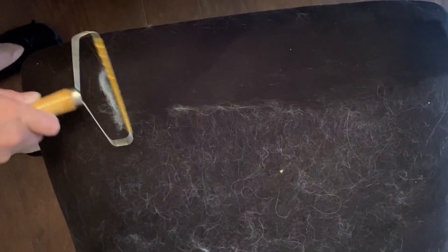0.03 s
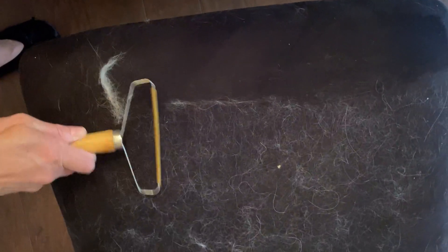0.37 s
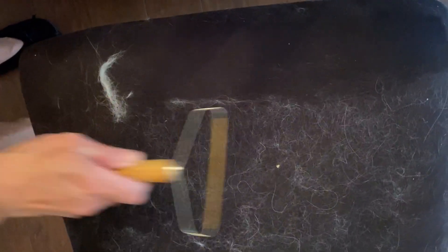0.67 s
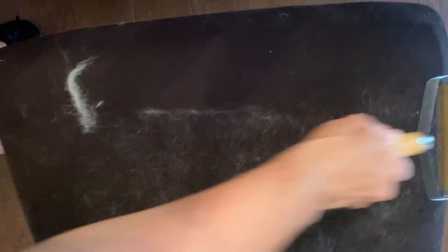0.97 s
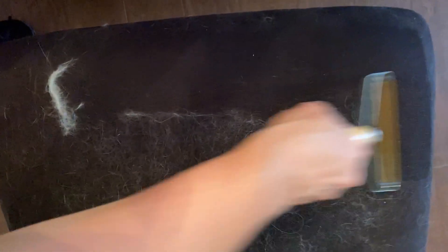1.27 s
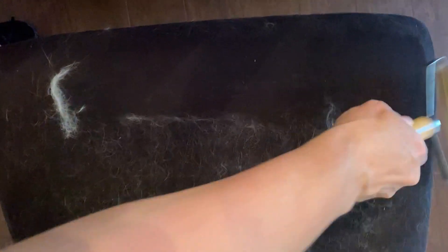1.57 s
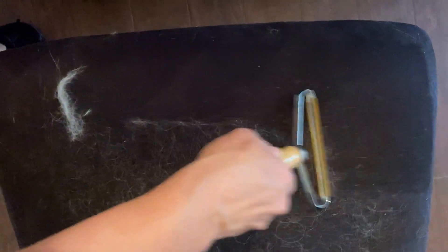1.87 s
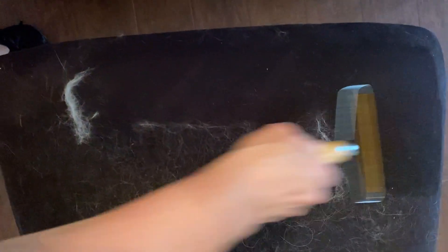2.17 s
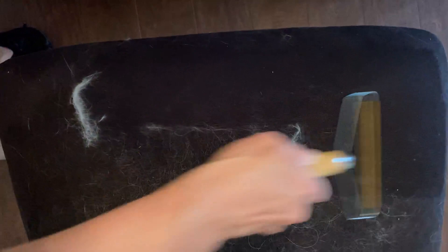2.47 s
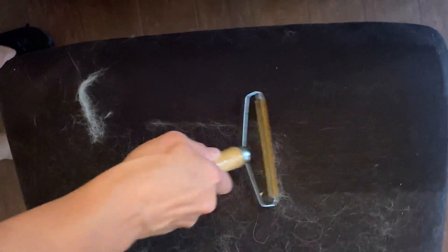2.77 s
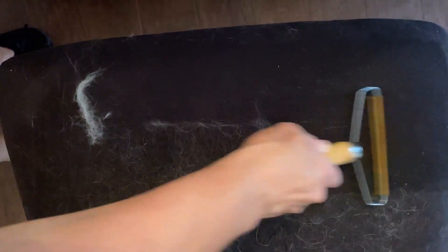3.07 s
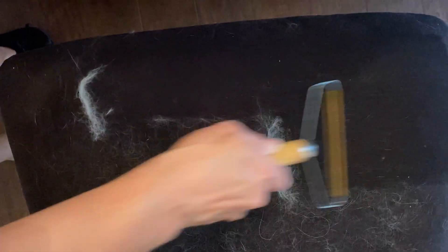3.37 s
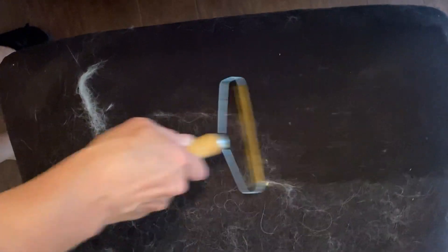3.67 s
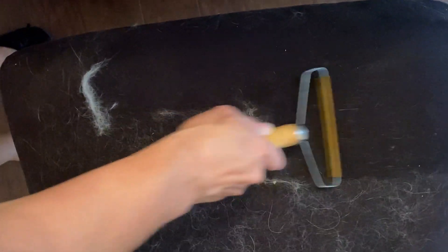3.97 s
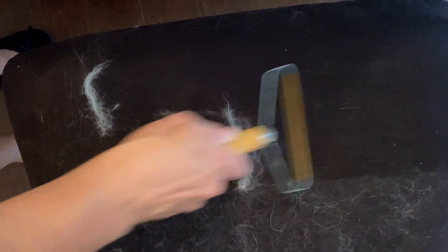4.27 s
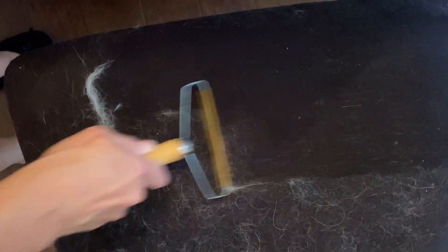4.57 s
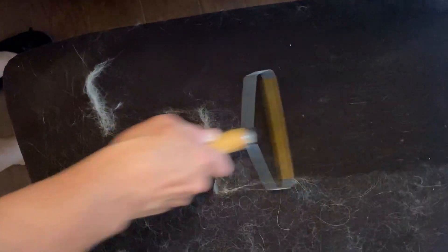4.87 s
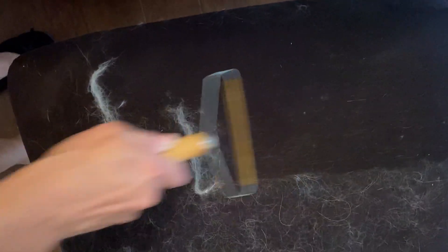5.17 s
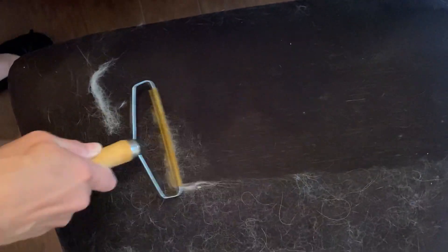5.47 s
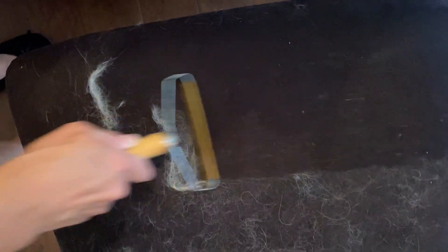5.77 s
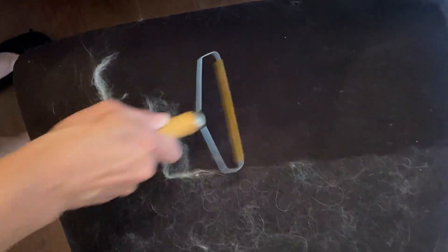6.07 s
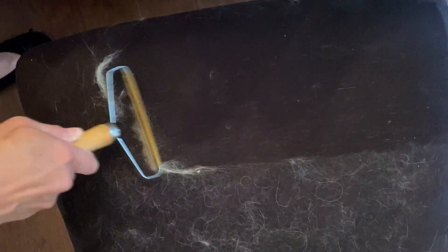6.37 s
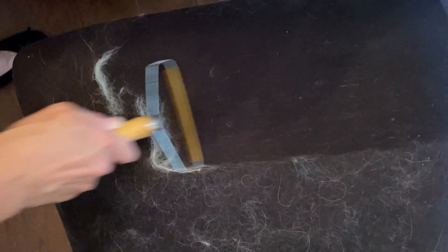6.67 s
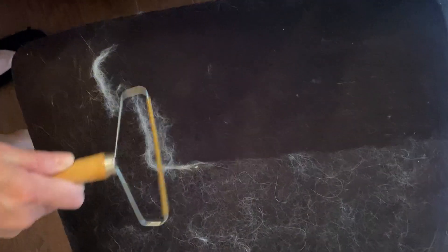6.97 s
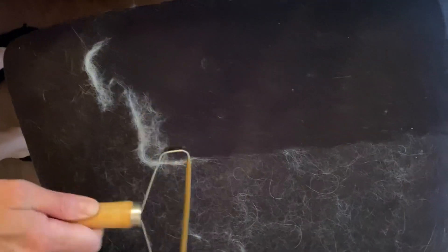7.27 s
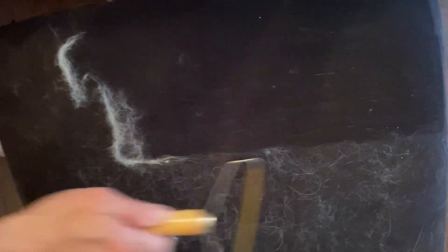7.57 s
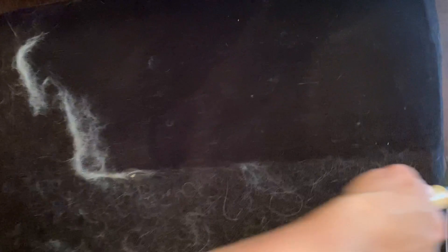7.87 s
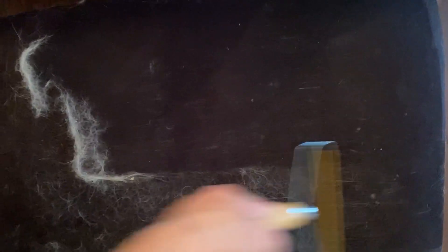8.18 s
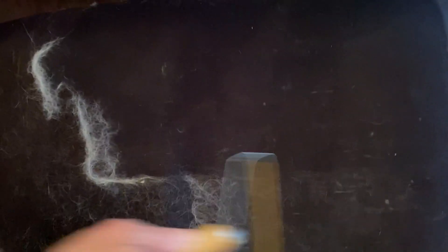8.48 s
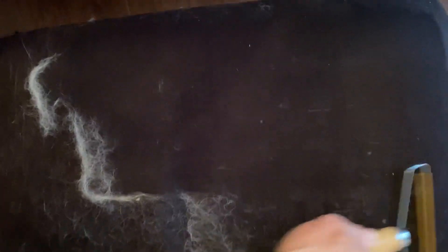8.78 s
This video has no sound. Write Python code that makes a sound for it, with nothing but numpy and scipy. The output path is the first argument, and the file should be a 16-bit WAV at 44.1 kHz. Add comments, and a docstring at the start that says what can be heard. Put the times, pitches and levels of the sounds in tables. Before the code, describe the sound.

Dry, rhythmic scraping of a metal blade on upholstery, each stroke landing with a small tick and thump, ending in one longer pull.

```python
"""Short, dry rasps on cloth, about two a second: a pet hair scraper pulled over a fabric chair seat.
The toothed blade lands with a tick and a soft thump, then plucks through the fibres while the seat
drums and the steel frame rings. The weave sings briefly where the edge lines up with the threads.
Light brushes fall around the run of strokes, and one longer pull ends it.
A small, faintly humming room answers, heard through a close pair of microphone ports."""
import sys
import numpy as np
from scipy import signal
from scipy.fft import rfft, irfft, next_fast_len
from scipy.io import wavfile
from scipy.ndimage import uniform_filter1d, map_coordinates

SR = 44100
rng = np.random.default_rng(int(sys.argv[2]) if len(sys.argv) > 2 else 0)


def unload_wav(signal):
    """Save mono or channel-first audio to the path in sys.argv[1] as 16-bit WAV at rate SR, clipped to [-1, 1]."""
    wavfile.write(
        sys.argv[1],
        SR,
        np.round(np.clip(np.atleast_2d(signal).T, -1, 1) * 32767).astype(np.int16),
    )


N = 388962


def amp(db):
    """Decibels to gain."""
    return 10 ** (np.asarray(db) / 20)


def unit(x):
    """Scale to rms 1."""
    return x / np.sqrt(np.mean(x ** 2) + 1e-20)


def along(points, hz):
    """Read a curve of (Hz, value) points on a log frequency axis."""
    freqs, values = np.transpose(points)
    return np.interp(np.log(hz + 1), np.log(freqs + 1), values)


def wobble(rate):
    """A smooth random curve with `rate` knots a second."""
    places = np.arange(0, N + 16, 16)
    knots = rng.standard_normal(int(N * rate / SR) + 4)
    return np.interp(np.arange(N), places, map_coordinates(knots, [places * rate / SR]))


def filtered(x, response):
    """Shape x with a complex response, given as a function of Hz."""
    size = next_fast_len(N + SR // 4, True)
    spectrum = rfft(x.astype(np.float32), size)
    curve = response(np.fft.rfftfreq(size, 1 / SR)).astype(np.complex64)
    return irfft(spectrum * curve, size)[..., :N]


def resonances(modes, hz):
    """Summed response of (centre Hz, width Hz, dB) modes."""
    return sum(amp(db) * 1j * hz * width / (centre * centre - hz * hz + 1j * hz * width)
               for centre, width, db in modes)


def add(track, s, sound):
    """Mix a sound into a track at s seconds."""
    rest = track[max(round(s * SR), 0):][:len(sound)]
    rest += sound[:len(rest)]


# The colour of the room's noise floor. Each row: frequency in Hz, spectral level in dB.
HUSH_SPECTRUM = [(20, -35), (40, -4), (65, 0), (100, -7), (200, -9), (350, -12), (550, -23), (1300, -28),
                 (2500, -35), (5000, -45), (15000, -62)]

def room_tone(hush_db, hum_hz, hum_db, start_db=-10, settle_s=0.92):
    """A bed of low room noise and faint mains hum that starts quieter and comes up."""
    t = np.arange(N) / SR
    drift = amp(1.5 * wobble(5))
    hush = unit(filtered(rng.standard_normal((2, N)), lambda hz: amp(along(HUSH_SPECTRUM, hz))))
    bed = amp(hush_db) * drift * hush
    bed[0] += amp(hum_db + wobble(3.3)) * np.sin(2 * np.pi * hum_hz * t)
    return bed * amp(start_db * np.maximum(1 - (t / settle_s) ** 2, 0))


# The small room's decay. Each row: frequency in Hz, seconds to fall 60 dB.
ROOM_DECAY = [(100, 0.6), (400, 0.38), (1500, 0.41), (5000, 0.41), (14000, 0.25)]

def room_reverb(x):
    """Two diffuse tails, for the direct and the scattered part; the bass hangs on longest."""
    hz, t, noise = signal.stft(rng.standard_normal((2, SR)), SR, nperseg=256)
    decay = amp(-60 * t / along(ROOM_DECAY, hz)[:, None])
    tail = signal.istft(noise * decay * (1 - np.exp(-t / 0.0009)), SR, nperseg=256)[1]
    return signal.fftconvolve(x[None], tail / np.linalg.norm(tail[0]), axes=1)[:, :N]


# The colour of cloth under the blade. Each row: frequency in Hz, spectral level in dB.
CLOTH_SPECTRUM = [(60, -8), (140, -8.5), (210, 3.5), (340, 2.5), (480, -1.5), (650, 2), (1000, 2.5),
                  (1700, 0), (2500, -4.5), (3500, -10), (4500, -12.5), (7500, -16.5), (12000, -20),
                  (16000, -23.5)]
# The seat's resonances under the cloth. Each row: centre in Hz, width in Hz, level in dB.
SEAT_MODES = [(201, 9.4, 1.5), (255, 29, -1), (370, 8.7, -7), (450, 120, -7), (580, 36, -12),
              (1100, 6.3, -14), (1340, 4, -8.5), (2780, 19, -13.5)]

def fibres(plucks_per_s, spread_db, rub):
    """Teeth pluck single fibres over a smooth rub; returns a direct and a scattered part."""
    plucks = (rng.random((2, N)) < plucks_per_s / SR) * rng.choice([-1, 1], (2, N))
    strength = amp(spread_db * np.minimum(rng.standard_normal((2, N)), 2))
    force = unit(plucks * strength) + rub * rng.standard_normal((2, N))
    return filtered(force, lambda hz: amp(along(CLOTH_SPECTRUM, hz)) * (1 + resonances(SEAT_MODES, hz)))


def soft_touch(dull_hz):
    """Fibres pressed rather than scraped: a duller rustle of rms 1."""
    pressed = fibres(plucks_per_s=3300, spread_db=6.5, rub=0.65)
    return unit(filtered(pressed, lambda hz: 1 / (1 + 1j * hz / dull_hz)))


# Passing touches. Each row: start in seconds, rustle in dB, hiss in dB relative to the rustle,
# attack in seconds, seconds to fall 60 dB.
BRUSHES = [(0.411, -56, -14.5, 0.0048, .069), (.542, -34.5, -13.5, .0045, .09),
           (.583, -44.5, -16.5, .015, 0.091), (1.178, -58, -7.5, .009, 0.45),
           (7.35, -60.5, -5, .0036, 0.76), (7.528, -35, -36.5, 0.01, .072), (7.545, -44, -29, 0.01, .36),
           (8.038, -53.5, -10.5, .008, 0.16), (8.804, -55.5, -19.5, 0.0045, .15)]

def brushes():
    """The tool brushes or taps the cloth: a dull rustle with some fibre hiss."""
    t, rustle, hiss = np.arange(SR // 2) / SR, np.zeros(N), np.zeros(N)
    for start, db, hiss_db, attack, t60 in BRUSHES:
        touch = amp(db - 60 * np.maximum(t - attack, 0) / t60) * np.minimum(t / attack, 1)
        add(rustle, start, touch)
        add(hiss, start, amp(hiss_db) * touch)
    return rustle * soft_touch(dull_hz=1497) + hiss * rng.standard_normal((2, N))


# The notes in the seat's thump. Each row: pitch in Hz, level in dB, seconds to fall 60 dB.
CUSHION_MODES = [(52.7, -12, 0.44), (78.8, 0, .17), (120.6, 1, 0.11), (219, -4, 0.11), (345, 0.5, 0.052)]

def cushion_bounce(t):
    """The struck cushion rings in low, damped modes, a little differently each time."""
    return sum(amp(db + rng.normal(0, 1.2) - 60 * t / t60) * np.sin(2 * np.pi * (hz * t + rng.random()))
               for hz, db, t60 in CUSHION_MODES)


# The blade meets the seat. Each row: time in seconds, then tick, low body and crack in dB before trims.
LANDINGS = [(0.024, -57.5, -43.5, -66), (0.408, -55, -37.5, -54), (0.548, -57, -34, -55.5),
            (1.696, -28.5, -40.5, -45.5), (2.156, -28, -40, -52.5), (2.651, -16, -38, -51.5),
            (3.123, -42.5, -36.5, -49.5), (3.558, -12.5, -36.5, -45.5), (4.015, -16, -34, -43),
            (4.448, -45, -39, -56.5), (4.913, -49.5, -36.5, -53.5), (5.359, -47.5, -36, -49),
            (5.768, -48.5, -40, -57), (6.226, -47, -40, -52.5), (6.675, -25, -41.5, -52),
            (7.531, -59, -49, -59.5), (8.007, -48, -43, -64.5), (8.799, -47.5, -39, -53.5)]

def landings(sweep_hz, glide_s, end_hz, tick_t60, bend_t60, crush_t60, thump_rise_s, crack_hz,
             tick_trim_db, bend_trim_db, crack_trim_db, thump_trim_db, crush_trim_db):
    """A landing sends a bending wave through the seat, crushes the pile and bounces the cushion."""
    t, hits, crush = np.arange(SR // 3) / SR, np.zeros(N), np.zeros(N)
    cushioned = signal.butter(2, crack_hz, fs=SR, output="sos")
    crack_shape = (amp(-60 * t / 0.025) + amp(-17 - 60 * t / 0.51)) * (1 - np.exp(-t / 0.00036))
    for start, tick_db, body_db, crack_db in LANDINGS:
        glide = glide_s * np.exp(rng.normal(0, 0.24))  # each spot has its own distance to the edge
        phase = 2 * np.pi * np.cumsum(end_hz + sweep_hz / (1 + t / glide)) / SR  # treble arrives first
        tick = amp(tick_db + tick_trim_db - 60 * t / tick_t60)
        bend = amp(body_db + bend_trim_db - 60 * t / bend_t60) * (1 - np.exp(-t / 0.0071))
        noise = signal.sosfilt(cushioned, rng.standard_normal(len(t)))
        crack = amp(crack_db + crack_trim_db) * crack_shape * noise
        thump_attack = 1 - np.exp(-(t / thump_rise_s) ** 2)
        thump = amp(body_db + thump_trim_db) * cushion_bounce(t) * thump_attack
        add(hits, start + 0.0015, (tick + bend) * np.sin(phase) + crack + thump)
        add(crush, start + 0.0014, amp(body_db + crush_trim_db - 60 * t / crush_t60))
    return hits + crush * soft_touch(dull_hz=900)[0]


# The weave's short notes. Each row: peak time in seconds, half length in seconds, pitch at full
# hand speed in Hz, level in dB relative to the rasp envelope, jitter as a fraction of the pitch.
WEAVE_NOTES = [(0.018, .025, 900, 4.5, 0.13), (1.833, .038, 3236, 2.5, 0.055),
               (2.28, .03, 3660, -3.5, 0.047), (2.715, 0.019, 900, 8, 0.034),
               (3.245, .022, 954, 13, 0.0047), (3.629, .016, 786, 8, .025), (4.131, .028, 965, 12, 0.0064),
               (4.55, .05, 1067, 0.5, 0.054), (5.021, 0.038, 3160, -1, .16), (5.448, .045, 2694, -1, 0.15),
               (5.91, .028, 2362, 4.5, 0.056), (6.301, .014, 2350, 8, 0.024), (6.388, .026, 1756, 9, .045),
               (6.843, .022, 1712, 9, .035), (8.294, .04, 1348, -4, 0.023)]

def weave(hand, rasp, second_db, third_db, flutter_db, pitch_power):
    """Threads pass under the blade and sing, at a pitch that follows the hand's speed."""
    t, tone = np.arange(N) / SR, np.zeros(N)
    jitter, flutter = wobble(450), amp(flutter_db * wobble(130))
    for peak, half, top_hz, db, uneven in WEAVE_NOTES:
        near = np.abs(t - peak) < np.pi * half
        pitch_hz = top_hz * hand[near] ** pitch_power * (1 + uneven * jitter[near])
        phase = 2 * np.pi * np.cumsum(pitch_hz) / SR
        wave = np.sin(phase) + amp(second_db) * np.sin(2 * phase) + amp(third_db) * np.sin(3 * phase)
        aligned = np.exp(-((t[near] - peak) / half) ** 2 / 2)  # the edge lies along the threads
        tone[near] += amp(db) * aligned * wave
    return tone * flutter * rasp


# The blade catches. Each row: peak time in seconds, level in dB, half length in seconds.
SNAGS = [(.028, -44, 0.0096), (1.264, -40, 0.042), (1.751, -36.5, .016), (1.905, -38.5, 0.0078),
         (2.212, -40, 0.025), (2.68, -43.5, 0.0069), (4.055, -33, 0.0064), (8.145, -34.5, 0.026),
         (8.365, -26.5, 0.019), (8.41, -35, 0.032)]

def snags():
    """An envelope of brief swells where the blade snags and jolts the seat."""
    t = np.arange(N) / SR
    return sum(amp(db) * np.exp(-np.minimum(((t - peak) / half) ** 2, 20)) for peak, db, half in SNAGS)


# The pulls of the blade. Each row: fastest moment, run-up and slow-down in seconds,
# rasp, seat drumming and fibre hiss in dB, pressure change in dB per second.
STROKES = [(0.005, .08, 0.1, -43, -42.5, -53.5, 4), (1.332, 0.11, 0.17, -38.5, -46, -41, -1),
           (1.825, 0.12, .16, -36.5, -40.5, -40, -1), (2.306, 0.13, 0.15, -37, -49, -39.5, -4),
           (2.774, .11, .14, -38, -46.5, -42.5, -18.5), (3.262, 0.12, 0.12, -33.5, -42.5, -40.5, -14),
           (3.69, .11, .14, -34.5, -46, -42.5, -19.5), (4.155, 0.11, 0.12, -33.5, -41, -40.5, -25.5),
           (4.586, 0.11, .15, -34.5, -45, -39.5, -12), (5.026, .098, .14, -33, -43.5, -40.5, -13.5),
           (5.468, 0.097, 0.13, -33, -43, -42, -2.5), (5.88, 0.095, 0.13, -36, -45.5, -46, -3.5),
           (6.325, .082, .14, -37.5, -46.5, -45.5, 8.5), (6.79, .1, 0.11, -37, -47.5, -48, -0.5),
           (8.325, 0.3, 0.14, -31, -39, -33, 3.5)]

def strokes(rasp_law, drum_law, hiss_law):
    """The hand's speed (0 to 1) and the rasp, drum and hiss envelopes that follow speed and pressure."""
    t, hand, envelopes = np.arange(N) / SR, np.zeros(N), np.zeros((3, N))
    laws = (rasp_law, drum_law, hiss_law)
    for fastest, run_up, slow_down, *levels_db, pressure in STROKES:
        near = (t - fastest > -run_up) & (t - fastest < slow_down)
        since = t[near] - fastest
        speed = np.abs(np.cos(np.pi / 2 * since / np.where(since < 0, run_up, slow_down)))
        hand[near] = speed
        for envelope, db, (rising, falling, drift) in zip(envelopes, levels_db, laws):
            power = np.where(since < 0, rising, falling)
            envelope[near] += amp(db + (pressure + drift) * since) * speed ** power
    return hand, *envelopes


def travelling(x, patchy_db, even_hz=6000):
    """Each spot the blade crosses favours other frequencies for a moment; the treble stays more even."""
    hz, _, spectra = signal.stft(x, SR, nperseg=1024)
    patches = rng.standard_normal(spectra.shape[1:])
    for axis in (0, 1):
        patches = uniform_filter1d(patches, size=5, axis=axis)
    colour_db = patchy_db * unit(patches) / np.hypot(1, hz / even_hz)[:, None]
    return signal.istft(spectra * amp(colour_db), nperseg=1024)[1][:, :N]


# The ring of blade and steel frame. Each row: centre in Hz, width in Hz, level in dB.
FRAME_MODES = [(955, 30, 0.5), (1747, 20, 10.5), (1919, 27, 3.5), (2874, 110, 3), (3670, 220, 2),
               (6200, 71, -1.5)]
# How freely the frame rings as the grip changes. Each row: time in seconds, level in dB.
FRAME_FREEDOM = [(0, -31), (2.3, -9), (2.75, -8.5), (3.25, -5.5), (3.7, -6), (4.15, -11), (4.6, -11),
                 (5.5, -15), (6.8, -52.5), (8.199, -25.5)]

def scrape(rasp, drum, hiss, low_hz, high_hz, air_hz, rasp_db, drum_db, air_db, ring_db, flicker_db):
    """The blade drags through the pile: the seat drums, the blade rasps and rings, the fibres hiss."""
    cloth = travelling(fibres(plucks_per_s=5000, spread_db=0.5, rub=0.65), patchy_db=3.5)
    below = lambda hz, edge: 1 / (1 + (hz / edge) ** 6)
    low = unit(filtered(cloth, lambda hz: below(hz, low_hz)))
    middle = unit(filtered(cloth, lambda hz: below(hz, high_hz) - below(hz, low_hz)))
    high = unit(filtered(cloth, lambda hz: below(hz, air_hz) - below(hz, high_hz)))
    air = unit(filtered(cloth, lambda hz: 1 - below(hz, air_hz)))
    freedom = amp(ring_db + np.interp(np.arange(N) / SR, *np.transpose(FRAME_FREEDOM)))
    ring = freedom * unit(filtered(cloth, lambda hz: resonances(FRAME_MODES, hz)))
    blade = (middle + ring) / np.sqrt(1 + freedom + freedom ** 2)  # the ring shares the rasp's energy
    fizz = hiss * high + amp(air_db) * np.sqrt(rasp * hiss) * air
    flicker = amp(flicker_db * wobble(150))
    return flicker * (amp(drum_db) * drum * low + amp(rasp_db) * rasp * blade + fizz)


# How the two ports hear. Each row: frequency in Hz, likeness of left and right (1 is identical).
PORT_LIKENESS = [(130, 0.91), (300, 0.96), (640, 0.23), (1400, 0.23), (2200, 0.072), (3500, 0.56),
                 (6800, 0.17), (8200, 0.95)]
# Each row: frequency in Hz, left minus right in dB.
PORT_BALANCE = [(150, 1), (330, 2), (480, 1.5), (660, -9), (860, -3), (1000, -5), (1550, -0.5), (1800, 1.5),
                (2600, -0.5), (3200, -3.5), (6000, -5.5), (8000, 0.5)]
# Each row: frequency in Hz, lead of the left port in cycles.
PORT_LEAD = [(280, 0), (480, -.13), (900, -.03), (3000, -.05), (6000, -.17), (7300, 0), (8300, .5),
             (9000, .5), (10400, 1), (12000, 1), (12900, 1.5), (14400, 1.5), (15000, 2)]

def microphone_ports(pair):
    """Direct and scattered sound reach the two ports as mid and side, leaning in level and phase."""
    width = lambda hz: np.arccos(np.clip(along(PORT_LIKENESS, hz), -1, 1)) / 2
    mid, side = filtered(pair, lambda hz: np.array([np.cos(width(hz)), np.sin(width(hz))]))
    sign = np.array([[1], [-1]])  # left, right
    lean = lambda hz: np.sqrt(2 / (1 + amp(-2 * sign * along(PORT_BALANCE, hz))))
    lead = lambda hz: np.exp(1j * np.pi * sign * along(PORT_LEAD, hz))
    return filtered(mid + sign * side, lambda hz: lean(hz) * lead(hz))


def scene():
    """Strokes, brushes and landings in the room; pair[0] is direct sound, pair[1] scattered."""
    # Each law: power of speed while speeding up, power while slowing, drift in dB per second.
    hand, rasp, drum, hiss = strokes(rasp_law=(1.0, 1.85, 0), drum_law=(0.18, 0.58, -11.5),
                                     hiss_law=(1.45, 1.51, 4.2))
    jolts = snags()
    snag_rasp = amp(-9.5) * jolts  # a snag mostly drums, but rasps a little too
    pair = scrape(rasp + snag_rasp, drum + jolts, hiss, low_hz=569, high_hz=3130, air_hz=7960,
                  rasp_db=3.0, drum_db=-0.5, air_db=-5.0, ring_db=1.0, flicker_db=-0.04)
    pair += brushes()
    pair[0] += weave(hand, rasp, second_db=-27, third_db=-28, flutter_db=1.1, pitch_power=0.65)
    pair[0] += landings(sweep_hz=1663, glide_s=0.001, end_hz=30, tick_t60=0.02, bend_t60=0.04,
                        crush_t60=0.11, thump_rise_s=0.01, crack_hz=7250, tick_trim_db=-7.5,
                        bend_trim_db=13, crack_trim_db=10, thump_trim_db=5, crush_trim_db=-6)
    reverb = amp(-12) * room_reverb(pair[0])
    bed = room_tone(hush_db=-63, hum_hz=120.8, hum_db=-65)
    return microphone_ports(pair + reverb + bed)


def record(dry):
    """Roll off the deepest bass and fade out the very top."""
    bass_hz, top_hz, fade_hz = 38, 15900, 300
    bass_cut = signal.butter(4, bass_hz, "highpass", fs=SR, output="sos")
    return filtered(signal.sosfilt(bass_cut, dry), lambda hz: np.clip((top_hz - hz) / fade_hz, 0, 1))


dry = scene()
out = record(dry)
unload_wav(out)
```